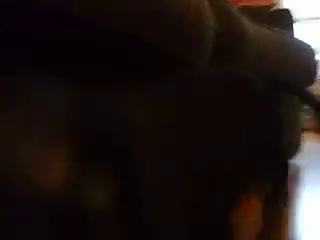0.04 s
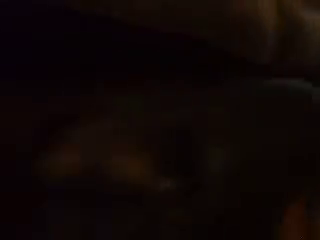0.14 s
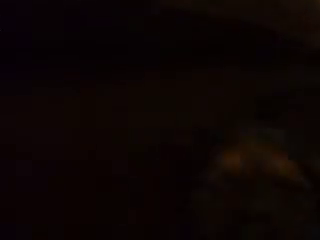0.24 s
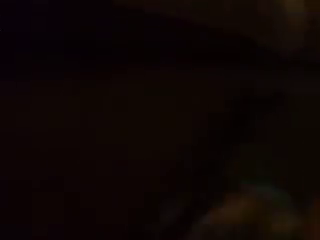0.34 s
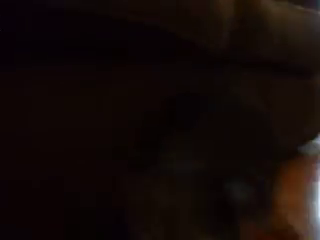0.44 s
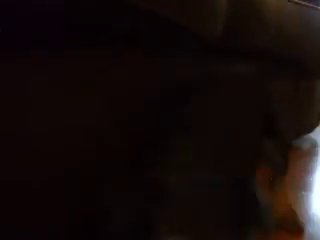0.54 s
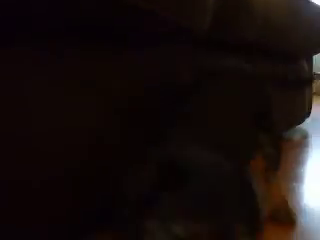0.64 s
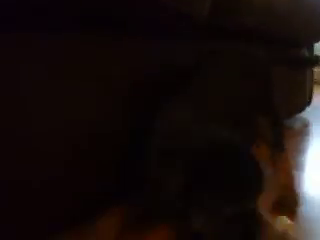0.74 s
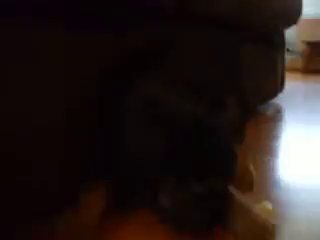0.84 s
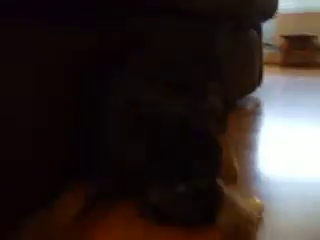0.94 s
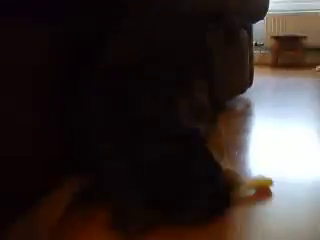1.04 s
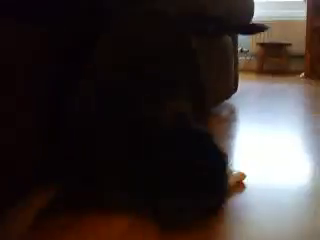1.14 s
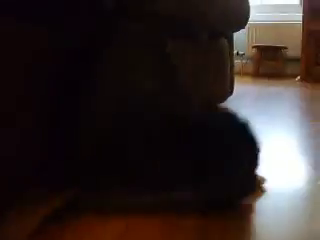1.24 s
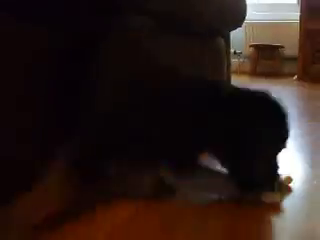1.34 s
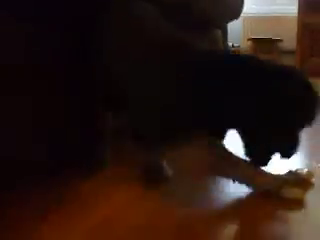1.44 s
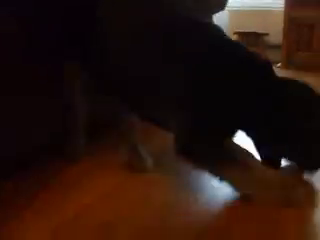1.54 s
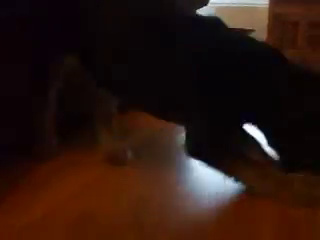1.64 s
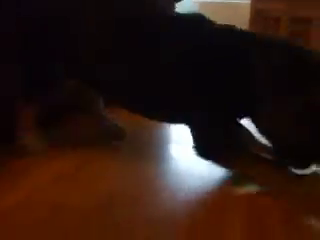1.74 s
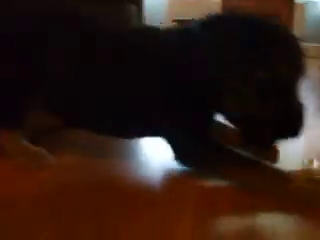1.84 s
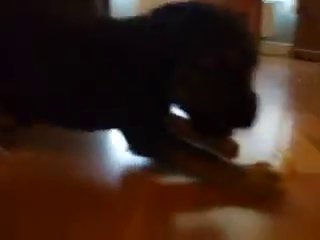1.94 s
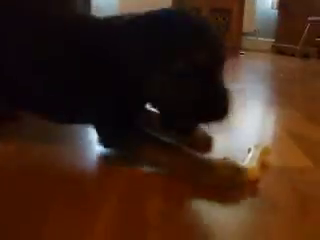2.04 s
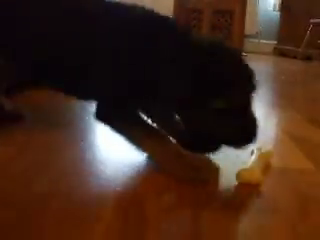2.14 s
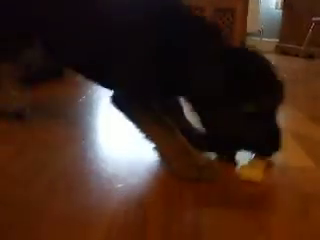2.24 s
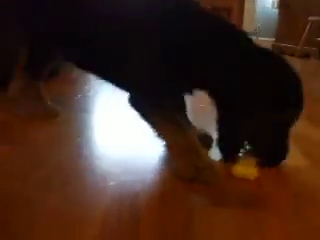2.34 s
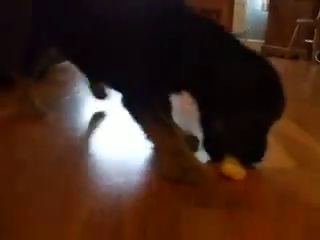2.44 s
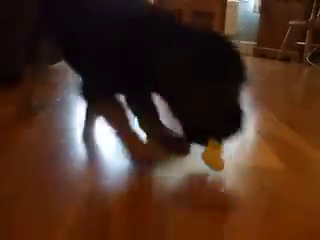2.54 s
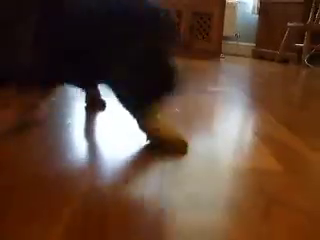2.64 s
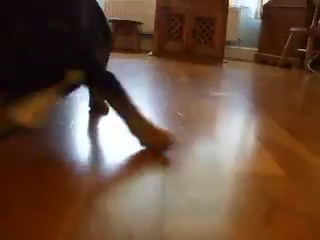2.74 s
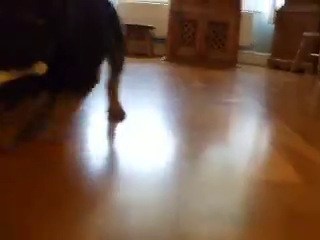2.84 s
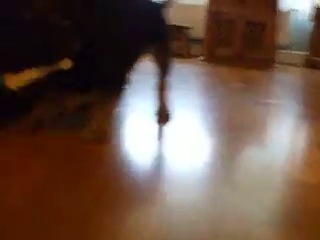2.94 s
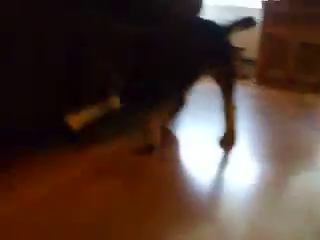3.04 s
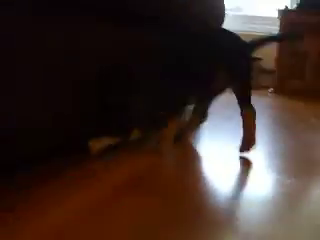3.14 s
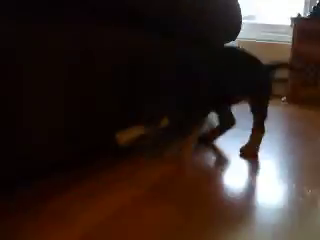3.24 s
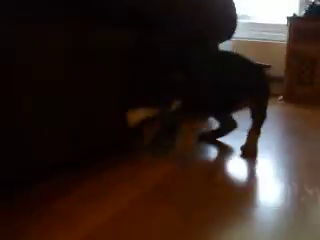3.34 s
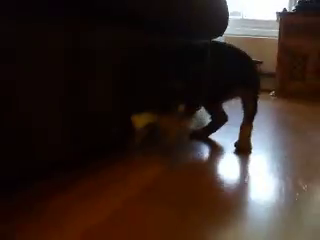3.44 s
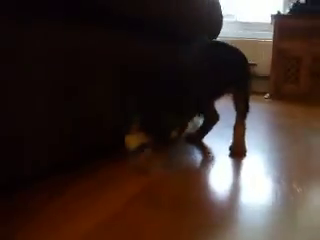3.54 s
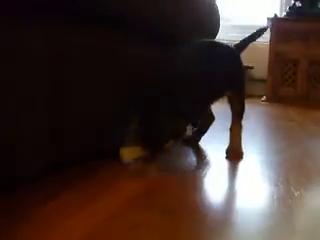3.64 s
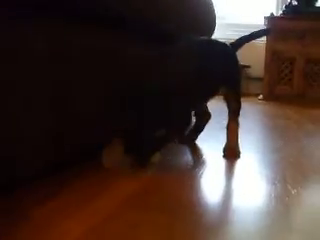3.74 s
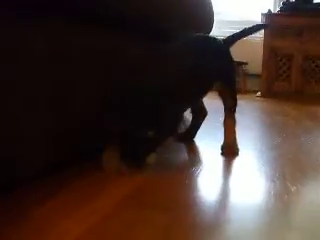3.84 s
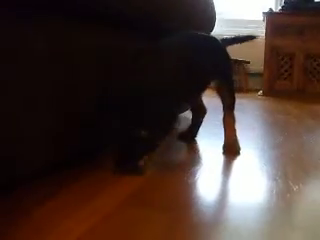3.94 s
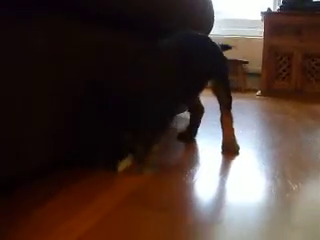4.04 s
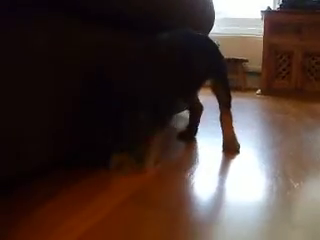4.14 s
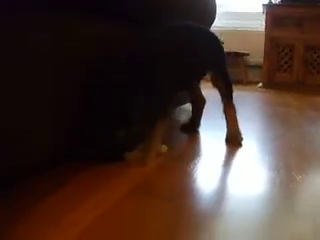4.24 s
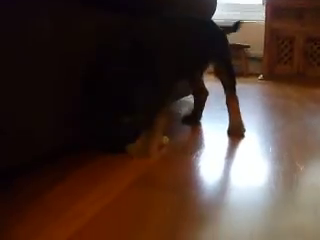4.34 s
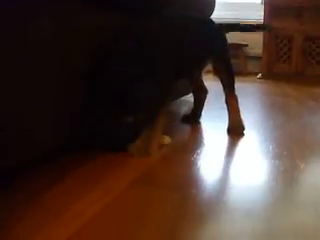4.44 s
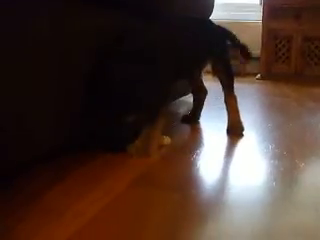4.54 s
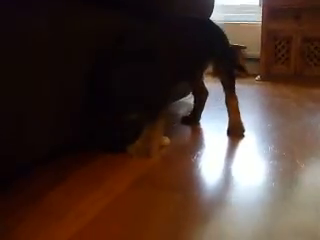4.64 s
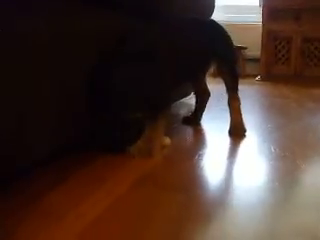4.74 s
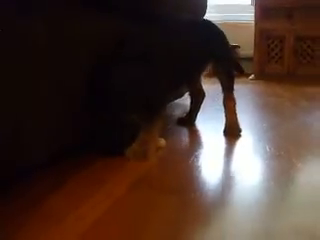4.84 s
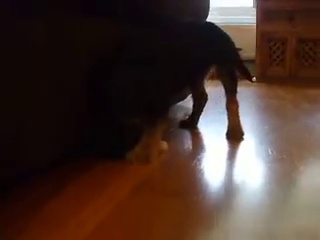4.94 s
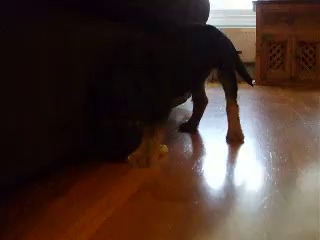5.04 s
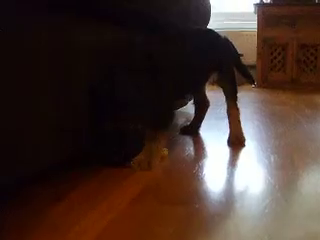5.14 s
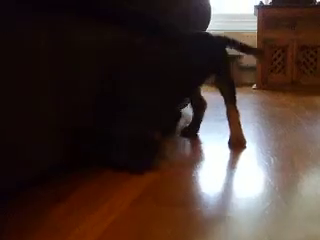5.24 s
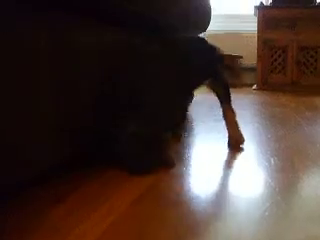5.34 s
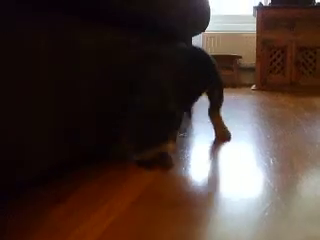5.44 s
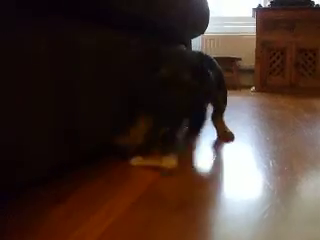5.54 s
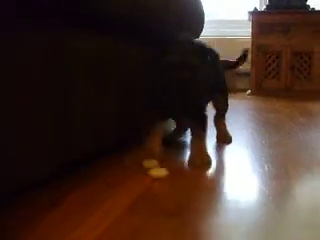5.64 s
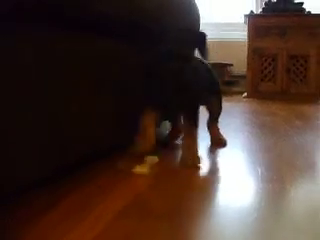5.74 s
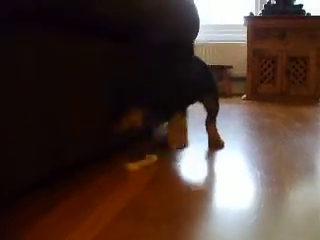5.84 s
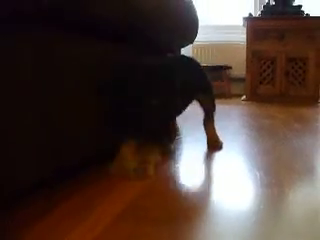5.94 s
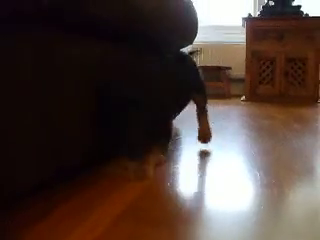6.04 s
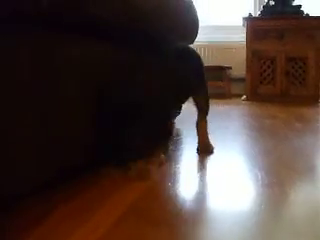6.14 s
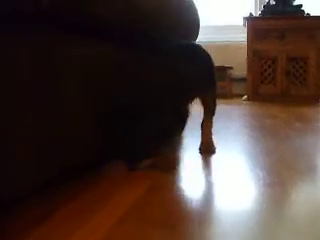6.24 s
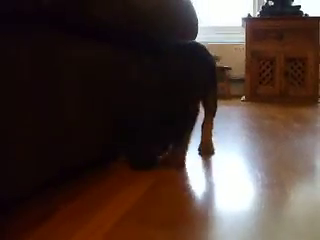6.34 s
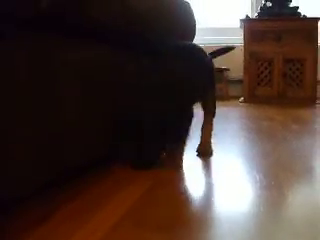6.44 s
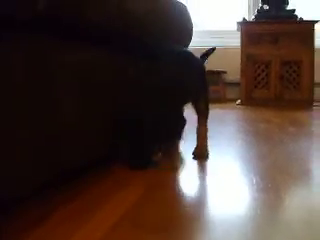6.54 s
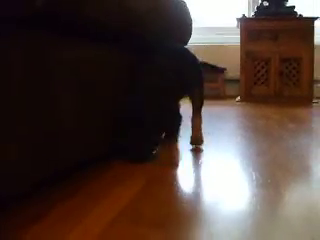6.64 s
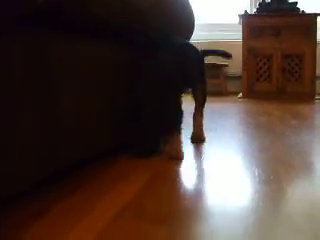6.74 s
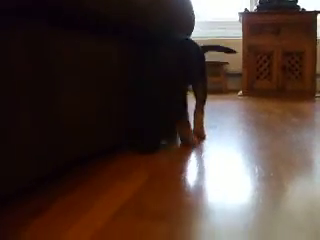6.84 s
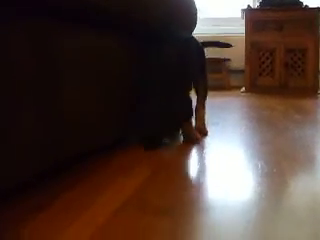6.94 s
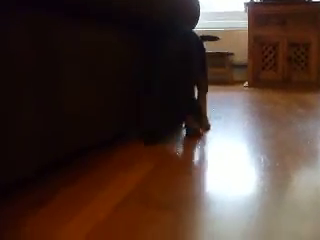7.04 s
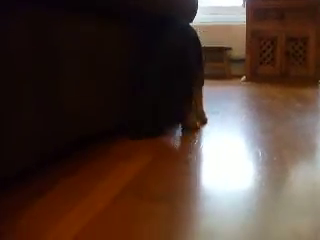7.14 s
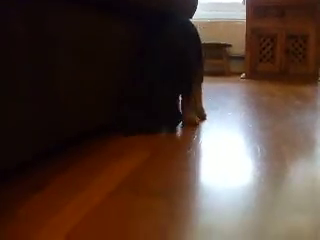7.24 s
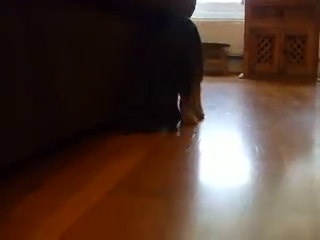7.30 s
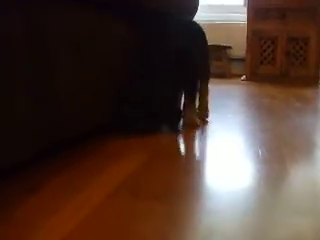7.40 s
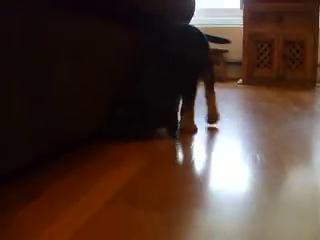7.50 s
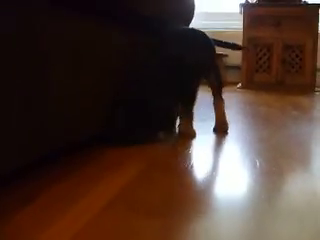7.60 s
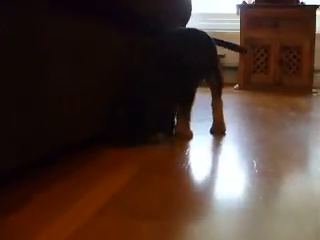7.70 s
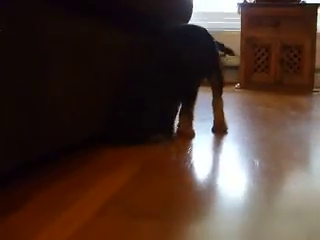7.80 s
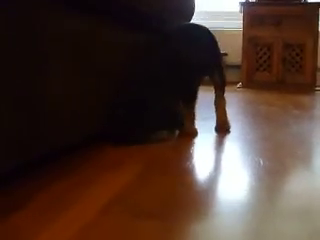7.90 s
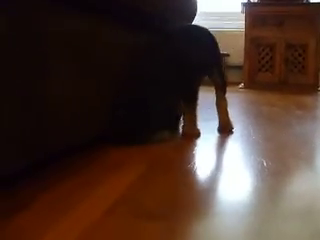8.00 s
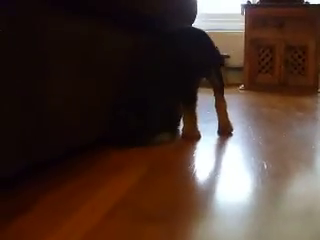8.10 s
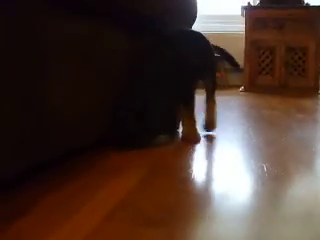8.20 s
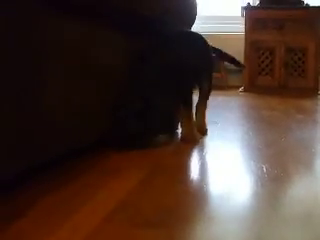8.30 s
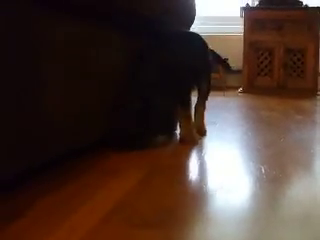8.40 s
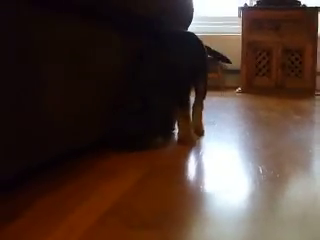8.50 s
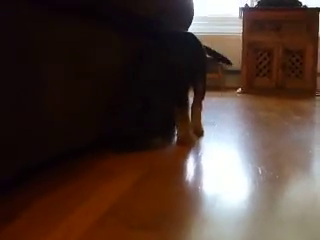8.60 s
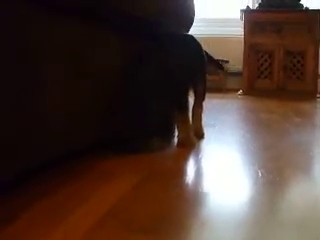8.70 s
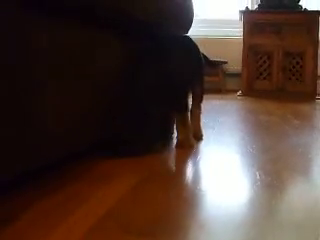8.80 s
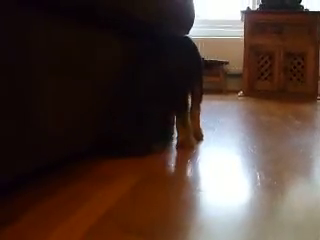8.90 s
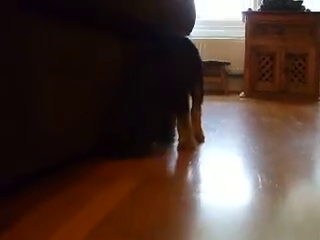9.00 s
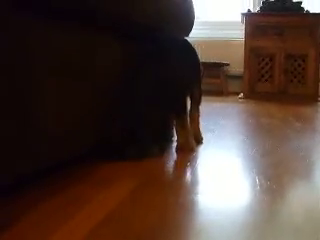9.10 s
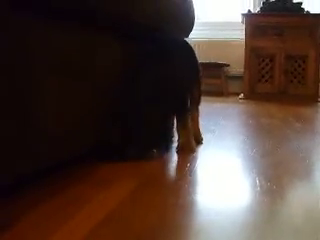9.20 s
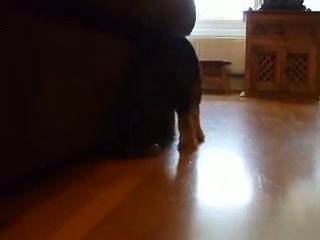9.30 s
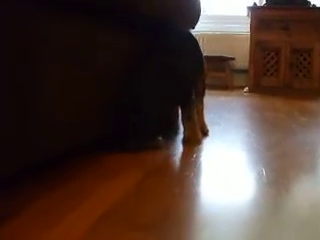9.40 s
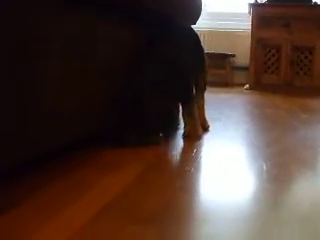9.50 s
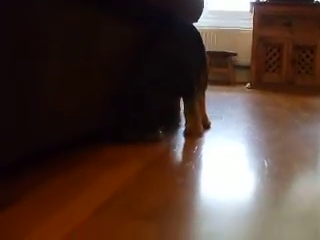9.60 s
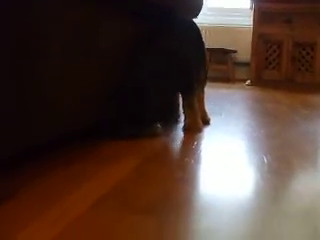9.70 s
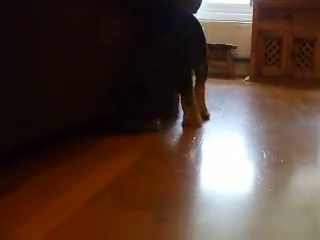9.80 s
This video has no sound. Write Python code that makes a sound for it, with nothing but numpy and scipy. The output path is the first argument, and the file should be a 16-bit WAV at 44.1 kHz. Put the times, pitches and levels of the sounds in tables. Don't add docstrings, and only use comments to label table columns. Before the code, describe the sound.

Hard chew knocks and claw clicks scatter over resonant floorboards as a puppy plays, yapping twice early and twice quickly around the middle.

```python
import sys
import numpy as np
from scipy import signal
from scipy.io import wavfile
from scipy.ndimage import uniform_filter1d

SR = 44100
rng = np.random.default_rng(int(sys.argv[2]) if len(sys.argv) > 2 else 0)


def volts_from_decibels(level):
    exponent = np.asarray(level, float) / 20
    return 10 ** exponent


def dump(signal):
    limited = np.clip(np.atleast_2d(signal).T, -1, 1)
    pcm = np.round(limited * 32767).astype(np.int16)
    wavfile.write(sys.argv[1], SR, pcm)


N = 434826
TIME = np.arange(N) / SR

# band_hz, level_db_per_hz
AIR = [(20, -20.5), (30, -50.5), (49, 0), (507, -3.5), (597, -8.5), (1390, -10), (3150, -10), (5400, -15)]
AIR_DB = -50
# band_hz, level_db_per_hz
RASP_COLOUR = [(530, -55.5), (900, -17), (1210, -34), (1560, -0.5), (1990, 5.5), (3740, -1), (5400, -24),
               (7020, -42.5)]
# band_hz, level_db_per_hz
DRAG_COLOUR = [(120, -17.5), (200, -18.5), (330, -9), (465, 0), (750, -0.5), (1000, 1), (1250, -12.5),
               (1700, -24.5)]
# start_s, length_s, rasp_db, drag_against_rasp_db
DRAG_STROKES = [(0, 0.045, -51.5, 4), (0.45, 0.15, -28, -6), (0.9, 0.2, -35, -6), (1.084, 0.051, -33, 9.5),
                (1.303, 0.032, -27, 5.5), (1.388, .12, -35.5, -9), (1.63, 0.059, -25, 5.5),
                (2.39, 0.078, -50, 9), (2.9, 0.81, -54.5, 8.5), (1.802, 0.059, -34, 8.5),
                (4.177, 0.098, -34, 10), (5.467, 0.03, -20.5, 9), (5.549, 0.26, -22, 0),
                (6.43, 0.2, -33, 5.5), (7.032, 0.31, -40.5, 1), (7.545, 0.43, -66, 24),
                (8.495, 1.12, -64, 14.5)]
STROKE_RISE_DB_PER_S, STROKE_FALL_DB_PER_S = 129, 139.5
# start_s, level_db
SHORT_SCUFFS = [(0.013, -57), (4.22, -58), (5.228, -25), (7.141, -39), (8.295, -41), (8.649, -36.5),
                (8.882, -35), (9.006, -35), (9.266, -35.5), (9.385, -36), (9.634, -34.5), (9.726, -42)]
SCUFF_S, SCUFF_DB_PER_S = 0.0028, 902
# mode_hz, level_db, t60_s
FLOOR_BOOM = [(88, -2, 0.13), (123, 0.5, 0.1), (162.3, 6, 0.35), (244.3, -6, 0.043)]
# start_s, peak_db
PAW_LANDINGS = [(0.062, -23.5), (0.239, -21), (0.6, -24.5), (0.843, -29), (1.618, -20), (1.861, -37),
                (2.16, -58), (2.388, -22.5), (2.713, -35), (3.287, -33), (3.571, -39), (4.148, -47),
                (5.216, -38), (5.772, -39), (5.991, -30), (6.353, -22.5), (6.493, -30), (6.751, -29),
                (6.962, -28.5), (7.1, -30), (7.224, -31.5), (7.43, -39), (7.593, -26.5), (7.792, -32),
                (7.931, -31), (8.18, -31.5), (8.31, -41.5), (8.51, -40), (8.64, -31.5), (8.771, -23.5),
                (8.88, -47), (9.0, -35), (9.127, -26.5), (9.52, -26), (9.726, -33.5)]
BOOM_DB, BOOM_RISE_DB_PER_S, BOOM_FALL_DB_PER_S = -10, 892, 126.5

# multiple_of_hollow_pitch, level_db, t60_s
HOLLOW_MODES = [(0.619, -9.5, 0.021), (1.012, 10, 0.023), (1.502, 9, 0.01)]
# mode_hz, level_db, t60_s
MIDDLE_MODES = [(1400, -8, .005), (1900, -2, .007), (2300, 0, .009), (2750, 0, .008)]
# mode_hz, level_db, t60_s
BRIGHT_MODES = [(3200, 0, .006), (3800, -3, .004), (4500, -6, .003), (5200, -10, .003)]
# multiple_of_contact_pitch, level_db, t60_s
CONTACT_MODE = (1, 0, .006)
PAD_CONTACT_HZ = 2300
SNAP_DB, SNAP_T60_S, SNAP_WIDTH_HZ = 2, .008, 2000
SPREAD_HZ, SPREAD_WIDTH_HZ = 2300, 1500
# start_s, peak_db, hollow_hz, contact_hz, hollow_db
CHEW_CRACKS = [(1.111, -13, 840, 3300, -10), (1.6295, -3.5, 746, 2100, -14), (1.632, -4, 746, 3000, -16),
               (1.829, -3, 743, 3740, -11), (2.169, -.8, 670, 1970, -9), (2.199, -12, 654, 1950, -13),
               (2.4295, -2.5, 760, 3000, -17), (2.4325, -9, 760, 3300, -20), (3.247, -8.5, 750, 2990, -17),
               (4.158, 0, 736, 2900, -18), (5.202, -15, 690, 3000, -3), (5.219, -6, 598, 1800, -18),
               (5.641, .5, 1010, 3600, -21), (5.654, -7, 724, 3400, -20), (5.687, -6, 784, 3200, -20),
               (5.779, -2, 585, 2400, -21), (5.991, -10, 746, 2530, -11), (6.015, -1, 610, 3350, -19),
               (6.372, 0, 598, 3600, -19), (6.487, -4.5, 620, 2220, -16), (6.565, -.5, 704, 3240, -23),
               (6.598, -8, 735, 3140, -16), (6.755, -2.2, 790, 2570, -19), (6.988, 0, 820, 2200, -23),
               (7.0, -6, 760, 2280, -19), (7.221, -2.6, 660, 3000, -20), (7.581, -7.5, 760, 3170, -18),
               (7.595, -6, 680, 2900, -20), (7.87, -7.5, 786, 2990, -19), (8.504, -9, 700, 2810, -21),
               (8.785, -6.5, 753, 2640, -17), (9.154, -7.5, 730, 2860, -21), (9.525, -9, 713, 2400, -13)]
# start_s, peak_db, hollow_hz, contact_hz
CLAW_TICKS = [(0.2301, -11.5, 640, 4220), (1.101, -21, 473, 2240), (1.203, -16, 762, 2010),
              (1.25, -33, 528, 2620), (1.2595, -14.5, 466, 3260), (1.3083, -10.5, 450, 3420),
              (1.6887, -6.5, 656, 2090), (1.7056, -20, 740, 1830), (1.7429, -13, 650, 1930),
              (1.8534, -15, 835, 3330), (2.0772, -26, 634, 1990), (2.2144, -17, 690, 1910),
              (2.7181, -18.5, 1200, 4500), (2.8105, -26.5, 720, 2070), (2.953, -25, 574, 1840),
              (3.5758, -18.5, 584, 1900), (3.8512, -17.5, 570, 3840), (3.8604, -38, 590, 2050),
              (4.2166, -12.5, 750, 3160), (4.2482, -16, 724, 1700), (4.2614, -20, 640, 3140),
              (4.3096, -16.5, 663, 2940), (5.6644, -23, 766, 2530), (6.2178, -24.5, 724, 4400),
              (6.7284, -26, 636, 2390), (6.9664, -12, 800, 1700), (7.1907, -11, 590, 2590),
              (7.2344, -17, 590, 2590), (7.2434, -18.5, 620, 3180), (7.2674, -15, 656, 2180),
              (8.5346, -18.5, 612, 2380), (8.6344, -22.5, 730, 2380), (8.8074, -23.5, 680, 2020),
              (9.7103, -22, 680, 3120), (9.7254, -26, 730, 2240)]
# start_s, peak_db, hollow_hz, contact_hz
CHEW_BUMPS = [(0.663, -34, 606, 3200), (0.92, -13.5, 725, 2470), (1.271, -11.5, 660, 1950),
              (1.486, -9, 794, 2200), (1.541, -22, 465, 2060), (1.597, -8.5, 745, 2040),
              (1.674, -9, 606, 1950), (1.783, -14, 724, 2100), (2.397, -7.5, 727, 2130),
              (2.4215, -8, 614, 1450), (4.183, -7, 680, 3580), (5.474, -11, 1054, 2600),
              (6.738, -17, 680, 2700), (6.954, -31, 646, 2130), (8.102, -22.5, 640, 1960),
              (8.124, -15, 796, 1940), (8.187, -10.5, 690, 2150), (8.211, -13, 636, 2160),
              (8.527, -17.5, 626, 3160), (8.558, -10, 800, 1920), (8.774, -27, 760, 2600),
              (8.993, -24, 682, 2310), (9.001, -19.5, 660, 1900), (9.2, -16, 640, 1920),
              (9.264, -18, 634, 1970), (9.364, -29, 790, 2960), (9.633, -19, 637, 1930)]
# start_s, peak_db, hollow_hz
PAD_TAPS = [(1.92, -25, 740), (2.388, -24, 545), (2.597, -29.5, 1007), (2.652, -29.5, 697),
            (3.037, -31.5, 607), (3.15, -25.5, 860), (3.798, -34, 620), (3.998, -20, 590),
            (4.06, -25.5, 640), (4.092, -27, 696), (5.156, -24, 610), (6.905, -25.5, 610),
            (7.82, -23.5, 660), (7.844, -28, 655), (7.999, -26.5, 585)]
# start_s, peak_db, hollow_hz
CHEW_CLONKS = [(.071, -23, 636), (.607, -17, 510), (.622, -20.5, 680), (.853, -14, 434), (1.806, -16, 780),
               (1.863, -21, 676), (6.954, -23, 646), (2.019, -27, 625), (2.397, -8, 270),
               (2.718, -18.5, 417), (3.576, -26.5, 650), (3.814, -20, 674), (3.825, -8, 650),
               (3.826, -18.5, 1196), (4.158, -34, 1100), (4.205, -42, 634), (4.228, -24, 666),
               (4.28, -40, 660), (6.357, -18.5, 606), (6.551, -24, 724), (7.132, -26, 635),
               (8.757, -26, 690), (8.785, -27, 307), (9.135, -28, 785), (9.496, -29, 715),
               (9.633, -28, 298)]
# hollow_db, bright_db, gain_db
KNOCK_KINDS = [
    (0, -9, 0),
    (-9, -8, -2.5),
    (-4, -14, -1.5),
    (1, -23, -4.5),
    (14, -20, -1.5),
]
KNOCK_CEILINGS = [3, -12, -6.5, -10, -6]

# band_hz, level_db, t60_s
ROOM_DECAY = [(100, -3, .4), (400, -2, .42), (1200, 0, .7), (2500, 0, .5), (5000, -1, .45)]
# time_s, rattle_and_room_db
SOFA_SCREEN = [(0, 6.5), (1.6, 2.5), (1.9, -0.5), (2.15, 0), (2.5, 2.5), (3.3, 4), (4.2, -4), (5.2, 3),
               (5.7, 5.5), (6.0, 4.5), (6.38, 8.5), (6.57, 3), (7.0, 5), (7.6, 4), (7.9, 3), (8.6, 6),
               (9.5, 7.5)]
KNOCK_ECHO_DB = -19

# time_s, pitch_hz, level_db
YAP_RISES = [
    [(.277, 175, -28), (.312, 215, -23), (.329, 320, -18), (.332, 420, -5), (.347, 530, -14),
     (.362, 597, -14), (.39, 645, -12), (.422, 677, -16)],
    [(.685, 250, -17), (.695, 290, -12), (.704, 320, -14), (.711, 365, -4), (.722, 455, -16),
     (.735, 580, -13), (.765, 675, -14), (.782, 693, -15)],
    [(5.2762, 680, -12), (5.2795, 715, -4.5), (5.29, 850, -14), (5.31, 1008, -11), (5.325, 1103, -12),
     (5.342, 1116, -14), (5.364, 1075, -15)],
    [(5.385, 450, -33), (5.44, 300, -32), (5.475, 230, -29), (5.488, 205, -27), (5.5, 260, -16),
     (5.52, 405, -14), (5.558, 615, -11), (5.598, 712, -21), (5.612, 704, -19)],
]
# after_top_s, share_of_pitch, against_top_db
YAP_ENDING = [
    (.015, .93, 3),
    (.028, .84, -5),
    (.036, .76, -12),
    (.062, .55, -16),
]
# opens_s, opening_0_to_1, ending_steps
YAP_MOUTHS = [
    (.33, 1, 4),
    (.69, 1, 4),
    (5.27, .93, 1),
    (5.49, 1.0, 4),
]
MOUTH_SHUT, SHUTS_S = .5, .04
# centre_hz, width_hz, at_ease_db, pressed_folds_db
THROAT_RESONANCES = [(574, 1800, -13.5, 0.5), (1228, 345, 9, 4), (2887, 733, 1, 5.5), (3940, 490, 4, 2),
                     (5380, 1300, 4.5, 2.5)]
# turn_db for five throat resonances, pocket_hz cancelled by the mouth,
# share of half-pitch beating in the fall
HEAD_TURNS = [
    (2, 1.5, 1.5, 2, -4, 2690, .03),
    (2, -.5, 2, .5, .5, 5900, .03),
    (0, 3, -2, -1, -4, 5500, 1.0),
    (1, 3, 0, -6, -2, 2800, .2),
]
# centre_hz, width_hz, gain_db
CHEEK_RINGS = [
    [(2490, 110, 12), (3350, 250, 5), (4650, 350, -6)],
    [(2090, 200, 6), (2450, 150, 3), (5500, 500, -10)],
    [(3350, 200, 1), (700, 100, -5), (4500, 300, 4)],
    [(900, 180, 13), (2110, 150, 8), (2540, 120, 8)],
]
CHEST_DB = -9
CHEST_DIP_HZ, CHEST_DIP_WIDTH_HZ, CHEST_DIP = 565, 95, .68
POCKET_WIDTH_HZ, POCKET_SHARE = 150, .95
# delay_s at the start, delay_change_s_per_s, share
FLOOR_RETURN = (.001188, .0031, .15)
WALL_RING_HZ, WALL_RING_WIDTH_HZ, WALL_RING = 2450, 180, 1.0
GAIN_RECOVERS_S = .012

# start_s, level_db, centre_hz, width_hz, length_s
PAD_SLIDES = [(2.952, -36, 4260, 1800, 0.036), (2.955, -56, 1830, 150, 0.2), (3.07, -47, 4800, 1500, 0.074),
              (3.105, -50, 3150, 350, .045), (3.15, -48, 3350, 450, .035), (3.155, -50, 2750, 200, .07),
              (3.17, -47, 4500, 900, .06), (6.209, -45, 4600, 450, 0.15)]
# time_s, level_db
SOFA_RUB = [(4.3, -54), (4.346, -39.5), (4.444, -33), (4.594, -35), (4.676, -27.5), (4.798, -34),
            (4.93, -31.5), (5.1, -47.5), (5.14, -57)]
# band_hz, level_db_per_hz
FUR_COLOUR = [(150, -25.5), (230, -17), (524, -17), (1430, -8), (3760, -15.5), (5800, -26.5), (7540, -63.5),
              (12800, -120)]


def rms_one(x):
    return x / np.sqrt(np.mean(x ** 2) + 1e-20)


def at_hz(points, hz, axis=1):
    points = np.array(points)
    return np.interp(np.log(hz), np.log(points[:, 0]), points[:, axis])


def highpass(x, hz):
    return signal.sosfilt(signal.butter(2, hz, "high", fs=SR, output="sos"), x)


def drift(rate):
    r = np.exp(-80 * np.pi * rate / SR)
    slow = signal.lfilter([1], [1, -2 * r, r * r], rng.standard_normal(N // 40 + 2002))[2000:]
    return np.interp(np.arange(N) / 40, np.arange(len(slow)), rms_one(slow))


def bands(white):
    edges = 20 * 2 ** np.arange(0, 8.6, .5)
    for k, (low, high) in enumerate(zip(edges, edges[1:])):
        band = signal.butter(2, [low, high], "band", fs=SR, output="sos")
        yield np.sqrt(low * high), signal.sosfilt(band, white[k % 2])


def coloured(white, spectrum, patchy_db):
    return rms_one(sum(volts_from_decibels(at_hz(spectrum, hz) + patchy_db * drift(9.6)) * band
                       for hz, band in bands(white)))


def resonance(x, hz, width_hz):
    r = np.exp(-np.pi * width_hz / SR)
    poles = [1, -2 * r * np.cos(2 * np.pi * hz / SR), r * r]
    return signal.lfilter(np.array([1, 0, -1]) * (1 - r * r) / 2, poles, x)


def swell(s, length, level_db, rise_db_per_s, fall_db_per_s):
    t = TIME[::200, None]
    below_db = np.maximum((s - t) * rise_db_per_s, (t - s - length) * fall_db_per_s)
    gain = volts_from_decibels(level_db - np.maximum(below_db, 0)).sum(axis=1)
    return np.interp(TIME, t[:, 0], gain)


def air():
    return volts_from_decibels(AIR_DB) * coloured(rng.standard_normal((2, N)), AIR, patchy_db=3.0)


def strokes(catches):
    s, length, rasp_db, drag_db = np.transpose(DRAG_STROKES)
    scuff_s, scuff_db = np.transpose(SHORT_SCUFFS)
    scuffs = swell(scuff_s, SCUFF_S, scuff_db, SCUFF_DB_PER_S, SCUFF_DB_PER_S)
    rates = STROKE_RISE_DB_PER_S, STROKE_FALL_DB_PER_S
    rasp_gain = swell(s, length, rasp_db - 5, *rates) + scuffs
    drag_gain = swell(s, length, rasp_db + drag_db - 9.5, *rates) + 0.63 * scuffs
    rasp = rasp_gain * coloured(catches, RASP_COLOUR, patchy_db=2.5)
    return rasp + drag_gain * coloured(catches[::-1, ::-1], DRAG_COLOUR, patchy_db=3.0)


def rattle(shake, catches, signs):
    grains = signs * (rng.random((2, N)) < 500 / SR)
    body = rms_one(resonance(catches[0], 720, 220))
    return volts_from_decibels(1) * shake * (coloured(grains, RASP_COLOUR, patchy_db=2.5) + 0.68 * body)


def boom(shake):
    push = rng.standard_normal(N) * volts_from_decibels(0.28 * drift(39))
    floor = rms_one(sum(volts_from_decibels(db) * resonance(resonance(push, hz, 3.0 / t60), hz, 6.0 / t60)
                        for hz, db, t60 in FLOOR_BOOM))
    s, level_db = np.transpose(PAW_LANDINGS)
    landings = swell(s + 0.014, 0, level_db + BOOM_DB, BOOM_RISE_DB_PER_S, BOOM_FALL_DB_PER_S)
    return (landings + volts_from_decibels(-18.5) * np.roll(shake, 300)) * floor


def scraping(hits):
    sizes = volts_from_decibels(3.5 * np.minimum(rng.exponential(1, (2, N)), 3)) * rng.choice([-1, 1], (2, N))
    clumps = volts_from_decibels(1.5 * drift(25))
    grains = sizes * (rng.random((2, N)) < 1500 / SR)
    catches = clumps * (grains + .45 * rng.standard_normal((2, N)))
    shake = signal.lfilter([.0015], [1, -.9985], np.abs(1.2 * highpass(hits, 1300)))
    return strokes(catches) + rattle(shake, catches, np.sign(sizes)) + boom(shake)


def knocks():
    out, after = np.zeros((2, N + 3000)), np.arange(3000) / SR
    modes = np.array(MIDDLE_MODES + HOLLOW_MODES + BRIGHT_MODES + [CONTACT_MODE])
    group = np.repeat([0, 1, 2, 3], [len(MIDDLE_MODES), len(HOLLOW_MODES), len(BRIGHT_MODES), 1])
    rounding = signal.butter(4, 5400, fs=SR, output="sos")
    onset = 1 - np.exp(-after / np.where(group == 1, .0008, .00015)[:, None])
    tables = [CHEW_CRACKS, CLAW_TICKS, CHEW_BUMPS, PAD_TAPS, CHEW_CLONKS]
    for table, kind, ceiling_db in zip(tables, KNOCK_KINDS, KNOCK_CEILINGS):
        hollow_db, bright_db, gain_db = kind
        for row in table:
            s, peak_db, hollow_hz, contact_hz, own_db = tuple(row) + (PAD_CONTACT_HZ, 0)[len(row) - 3:]
            tune, weight, lag = rng.standard_normal((3, len(modes)))
            group_db = np.array([-9.5, 0, bright_db + 2.0, -6.5])[group]
            level_db = peak_db + group_db + modes[:, 1] + 1.3 * weight * (group < 3)
            detune = 1 + .1 * tune
            hz = modes[:, 0] * np.choose(group, [detune, hollow_hz, detune, contact_hz])
            rings = np.sin(2 * np.pi * hz[:, None] * after + lag[:, None] / 3)
            rings *= volts_from_decibels(level_db[:, None] - 60 * after / modes[:, 2:]) * onset
            snap_gain = volts_from_decibels(peak_db + bright_db + 9.5 + SNAP_DB - 60 * after / SNAP_T60_S)
            snap = snap_gain * resonance(rng.standard_normal(3000), contact_hz, SNAP_WIDTH_HZ)
            knock = signal.sosfilt(rounding, rings[group != 1].sum(axis=0) + snap)
            hollow = rings[group == 1].sum(axis=0)
            knock = knock / np.abs(knock).max()
            knock = knock + volts_from_decibels(hollow_db + own_db) * hollow / np.abs(hollow).max()
            knock = knock / np.abs(knock).max()
            click = resonance((after == 0) * 1.0, (SPREAD_HZ + contact_hz) / 2, SPREAD_WIDTH_HZ)
            spread = 3.5 * volts_from_decibels(bright_db / 2) * click * np.sqrt(np.sum(knock ** 2))
            gain = volts_from_decibels(min(peak_db + gain_db, ceiling_db))
            out[:, round((s + .0012) * SR):][:, :3000] += gain * np.array([knock, spread])
    return highpass(out[:, :N], 150)


def room_echo():
    after = np.arange(SR) / SR
    tail = 0
    for hz, band in bands(rng.standard_normal((2, SR))):
        tail = tail + volts_from_decibels(at_hz(ROOM_DECAY, hz) - 60 * after / at_hz(ROOM_DECAY, hz, axis=2)) * band
    tail = tail * np.clip((after - .006) / 0.013, 0, 1)
    return tail / np.sqrt(np.sum(tail ** 2))


def throat(hz, pitch, mouth, after, turn, cheeks):
    pressed = 1 / (1 + (pitch / pitch.max() / .88) ** 12) * (np.gradient(pitch) > 0)
    pressed = uniform_filter1d(pressed, size=300)
    gain = 0
    for (centre, width, db, hard_db), turn_db in zip(THROAT_RESONANCES, turn):
        level = volts_from_decibels(db + turn_db + pressed * (hard_db - db))
        gain = gain + level / (1 + 2j * (hz - centre * mouth) / width) ** 2
    gain = gain * (1 - POCKET_SHARE * (1 - pressed) / (1 + ((hz - turn[5]) / POCKET_WIDTH_HZ) ** 2))
    for ring_hz, width, ring_db in cheeks:
        gain = gain * (1 + (volts_from_decibels(ring_db) - 1) / (1 + ((hz - ring_hz) / width) ** 2))
    delay, slide, share = FLOOR_RETURN
    gain = gain * (1 + share * np.exp(-2j * np.pi * hz * (delay + slide * after)))
    gain = gain / (1 + (hz / (6500 * np.minimum(mouth / .93, 1) ** 3)) ** 8)
    dip = 1 - CHEST_DIP * np.exp(-((pitch - CHEST_DIP_HZ) / CHEST_DIP_WIDTH_HZ) ** 2)
    gain[0] = (np.abs(gain[0]) + volts_from_decibels(CHEST_DB)) * dip
    return gain


def yap(rows, turn, cheeks):
    s, pitch, level_db, mouth = np.transpose(rows)
    span = slice(int(s[0] * SR), int(s[-1] * SR))
    t = TIME[span]
    pitch, mouth = [uniform_filter1d(np.interp(t, s, c), size=300) for c in (pitch, mouth)]
    rough = 1 / (1 + (pitch / 390) ** 10)
    phase = 2 * np.pi * np.cumsum(pitch * (1 + 0.09 * rough * drift(140)[span])) / SR
    order = np.arange(1, 31)[:, None]
    gain = throat(order * pitch, pitch, mouth, t - s[0], turn, cheeks)
    falling = uniform_filter1d(np.gradient(pitch) < 0, size=900, output=float)
    beat = 1 + turn[6] * falling * np.cos(phase / 2) * np.minimum(order / 3.5, 1) ** 2
    voice = np.sum(beat * gain * np.exp(1j * order * phase), axis=0).real
    voice = voice / np.sqrt(np.sum(np.abs(gain) ** 2, axis=0) / 2)
    breath = signal.lfilter([1, -.6], [1], rng.standard_normal(len(pitch)))
    puffs = breath * (1 + np.cos(phase)) * np.minimum(mouth, 1) ** 4
    edge = np.clip(np.minimum(t - s[0], (s[-1] - t) / 12) / 0.0006, 0, 1)
    out = np.zeros(N)
    out[span] = volts_from_decibels(np.interp(t, s, level_db) - 2.5) * edge * (voice + .28 * rough * puffs)
    return out


def phrase(rise, mouth, turn, cheeks):
    top_s, top_hz, top_db = rise[-1]
    opens_s, opening, steps = mouth
    ending = [(top_s + s, top_hz * share, top_db + db) for s, share, db in YAP_ENDING[:steps]]
    rows = [(s, hz, db, opening if opens_s < s < top_s + SHUTS_S else MOUTH_SHUT)
            for s, hz, db in rise + ending]
    return yap(rows, turn, cheeks)


def slides():
    out, noise = np.zeros(N), rng.standard_normal(N)
    for s, level_db, hz, width_hz, length in PAD_SLIDES:
        shape = np.clip(np.minimum((TIME - s) / 0.0011, (s + length - TIME) / 0.022), 0, 1)
        squeak = rms_one(resonance(resonance(noise, hz, width_hz), hz, width_hz))
        out += volts_from_decibels(level_db) * shape * squeak
    return out


def rustle():
    s, level_db = np.transpose(SOFA_RUB)
    gain = volts_from_decibels(np.interp(TIME, s, level_db, left=-90, right=-90))
    return gain * coloured(rng.standard_normal((2, N)), FUR_COLOUR, patchy_db=1.2)


def held_down(voice):
    loudness = np.sqrt(uniform_filter1d(voice ** 2, size=600) + 1e-12)
    keep = np.exp(-1 / (GAIN_RECOVERS_S * SR))
    loudness = np.maximum(loudness, signal.lfilter([1 - keep], [1, -keep], loudness))
    return 1 / (1 + loudness / .035)


def scene():
    hits, clicks = knocks()
    voice = sum(phrase(*parts) for parts in zip(YAP_RISES, YAP_MOUTHS, HEAD_TURNS, CHEEK_RINGS))
    thin = highpass(voice, 800)
    thin = thin + WALL_RING * resonance(thin, WALL_RING_HZ, WALL_RING_WIDTH_HZ)
    thin = thin + 0
    thin = wall_colour(voice)
    screen = volts_from_decibels(np.interp(TIME, *np.transpose(SOFA_SCREEN)))
    to_room = volts_from_decibels(-8.0) * thin + screen * (volts_from_decibels(KNOCK_ECHO_DB) * hits + volts_from_decibels(-19.5) * clicks)
    wet = signal.fftconvolve(to_room, room_echo())[:N]
    quiet = wet + scraping(screen * hits) + slides() + rustle() + air()
    return (voice + hits + held_down(voice) * quiet)[None]


def wall_colour(voice):
    thin = highpass(voice, 800)
    ringing = thin + WALL_RING * resonance(thin, WALL_RING_HZ, WALL_RING_WIDTH_HZ)
    return ringing + .6 * resonance(thin, 1130, 300) - .4 * resonance(thin, 3900, 300)


def band_limit(x):
    return signal.sosfilt(signal.butter(12, 16810, fs=SR, output="sos"), x)


def record(dry):
    step = 4
    narrow = signal.sosfilt(signal.butter(8, 6100, fs=SR, output="sos"), dry)
    kept = step * narrow * (np.arange(N) % step == 0)
    smooth = signal.sosfiltfilt(signal.cheby2(8, 35, 6350, fs=SR, output="sos"), kept)
    mix = np.clip(smooth, -.72, .73) - .0026
    return band_limit(mix)


dry = scene()
out = record(dry)
dump(out)
```